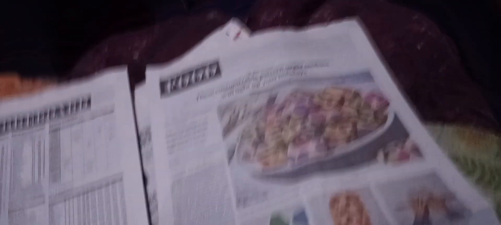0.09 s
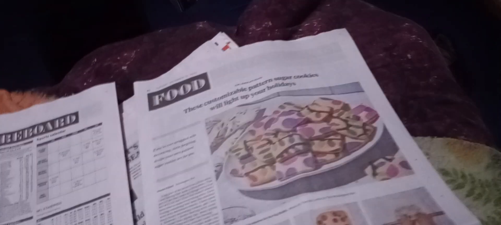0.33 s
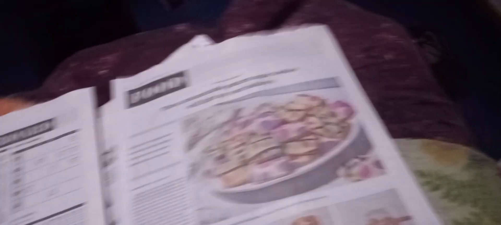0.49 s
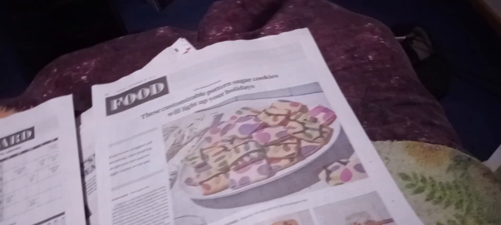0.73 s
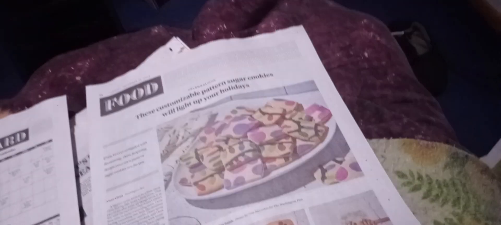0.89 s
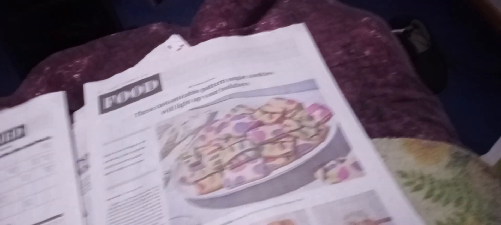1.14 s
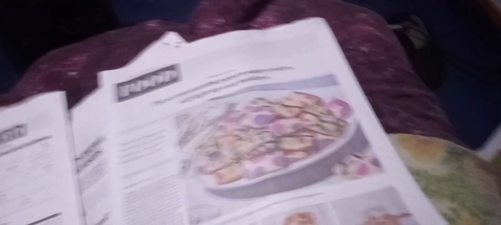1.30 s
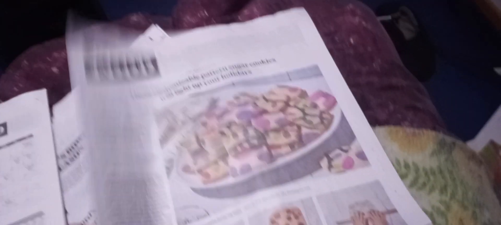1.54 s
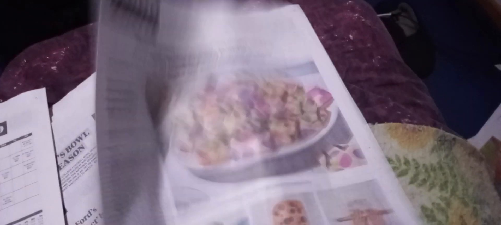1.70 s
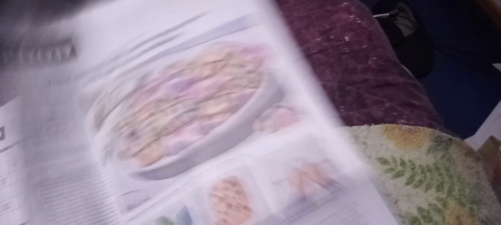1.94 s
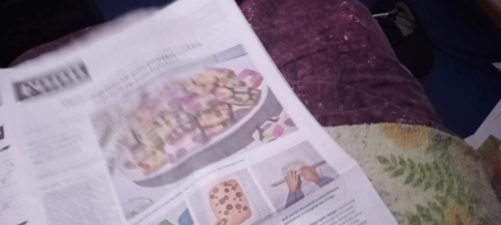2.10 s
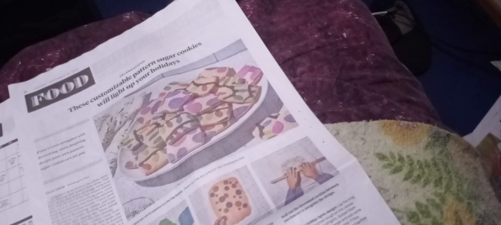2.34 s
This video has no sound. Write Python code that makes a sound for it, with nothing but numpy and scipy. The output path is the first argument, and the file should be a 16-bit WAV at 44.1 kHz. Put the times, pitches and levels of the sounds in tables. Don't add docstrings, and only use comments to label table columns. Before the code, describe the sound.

Crisp newspaper rustling in two busy bursts, with sharp fold snaps, fading to faint shuffles

```python
import sys
import numpy as np
from scipy import signal
from scipy.fft import rfft, irfft
from scipy.io import wavfile
from scipy.ndimage import uniform_filter1d

SR = 44100
rng = np.random.default_rng(int(sys.argv[2]) if len(sys.argv) > 2 else 0)


def master_out(mix):
    frames = np.transpose(np.atleast_2d(mix))
    ceiling = np.clip(frames, -1, 1)
    pcm = np.round(ceiling * 32767).astype(np.int16)
    wavfile.write(sys.argv[1], SR, pcm)


def decibels_to_gain(level_db):
    exponent = np.asarray(level_db, float) / 20
    return 10 ** exponent


N = 110250

# (start [s], hold [s], sliding [dB], crumpling [dB], hard bending [dB])
STROKES = [(.02, 0.21, -65.5, -67, -67.5), (.215, 0.03, -38.5, -32, -43),
           (0.249, 0.12, -47.5, -48.5, -58.5), (0.36, 0.057, -31, -33, -47), (0.422, 0.053, -41, -65, -56),
           (0.509, 0.032, -42.5, -36.5, -44.5), (0.553, 0.097, -37.5, -37.5, -61),
           (0.623, 0.057, -60, -36, -47), (0.709, 0.12, -31, -27.5, -43.5),
           (0.796, 0.17, -28.5, -32, -49.5), (0.932, 0.075, -32.5, -21.5, -29.5),
           (0.997, 0.17, -33, -34.5, -52.5), (1.14, 0.08, -55, -36, -82), (1.234, 0.24, -74, -51.5, -95),
           (1.42, 0.15, -55, -76, -95), (1.529, 0.35, -52, -43.5, -70), (1.636, 0.083, -35.5, -31.5, -56),
           (1.716, 0.021, -32, -32, -36.5), (1.748, 0.064, -32, -26.5, -34.5),
           (1.781, 0.14, -31.5, -27.5, -49), (1.921, 0.08, -43, -26, -44.5),
           (2.005, 0.085, -35.5, -29, -38), (2.095, 0.017, -61, -30, -55), (2.165, 0.06, -49, -42.5, -82),
           (2.244, 0.13, -42.5, -43.5, -72), (2.394, 0.079, -51, -49.5, -80), (2.456, 0.068, -41, -62, -65)]
# (start [s], hold [s], level [dB])
RUBS = [(.21, 0.069, -41.5), (.28, .08, -51), (.36, 0.063, -32.5), (.44, 0.21, -45), (.56, 0.067, -45),
        (.64, .1, -32.5), (.75, 0.076, -24.5), (.85, 0.06, -26.5), (.96, 0.084, -30), (1.04, 0.14, -35),
        (1.2, 0.72, -52), (1.64, 0.062, -43.5), (1.71, 0.042, -34), (1.77, 0.045, -25.5),
        (1.84, 0.066, -32.5), (1.93, .16, -41.5), (2.12, .15, -51), (2.28, 0.12, -44), (2.39, 0.054, -48),
        (2.455, 0.046, -42.5)]
# (time [s], peak [dB], body [dB], brightness [dB], length [ms])
SNAPS = [(0.216, -29.5, -20.5, -30, 0.97), (0.23, -20, -45, 7, 0.24),
         (0.372, -20.5, -25, -3, 1.6), (0.51, -17.5, -10.5, -3, 1.8),
         (0.5135, -15.5, -24, -16, 3), (0.5765, -21.5, -30, -13, 1.7),
         (0.637, -14.5, -20.5, -20, 0.87), (0.658, -16, -13.5, -12, 2.4),
         (0.678, -9, -29, -7.5, 1.69), (0.685, -24, -21, -35, 2.5), (0.72, -20, -12, -5.5, 1.6),
         (0.77, -20.5, -17.5, -10, 2.5), (0.832, -10, -40, -17, 0.57),
         (0.8625, -18, -33, -39, 1.8), (0.931, -13, -16, -10, 2.2), (0.94, -23, -9, -27, 1.2),
         (0.9515, -25, -40, -21, 1.5), (0.995, -17.5, -24, -7, 2.2),
         (1.086, -13.5, -9.5, -1.5, 1.7), (1.1455, -26.5, -25, -25, 2.4),
         (1.193, -27.5, -24.5, -30, 2.1), (1.197, -24, -18, -36, 1.3),
         (1.327, -34.5, -21, -40, 1.9),
         (1.387, -34.5, -19, -13, 7.1), (1.527, -35, -22, -22, 2.3), (1.54, -31, -30, -50, 1.8),
                     (1.64, -18.5, -6, -30, 1.9), (1.714, -21, -33, -11, 1.6),
                     (1.717, -12.5, -23, -5.5, 1.3), (1.7239, -12.5, -17, -10, 1.26),
                     (1.728, -16, -39, -15, 1.3), (1.777, -19, -27, -13, 4.7),
                     (1.815, -16.5, -16, -8, 2.24), (1.836, -13, -42, -25, 1.8),
                     (1.954, -22.5, -24, -25, 1.8), (1.96, -20, -21, -10, 1.1),
                     (1.968, -11.5, -24, 0.5, 1.23), (2.017, -14.5, -47, -11, 3), (2.032, -28, -6, -6, 2.9),
                     (2.037, -12, -42, -15.5, 0.51), (2.057, -17, -35, 1, 0.52),
                     (2.085, -16.5, -55, -16, 3.9), (2.2012, -21.5, -47, -25, 0.52),
                     (2.209, -38, -9.5, -35, 4.2), (2.43, -29.5, -32, -35, 1.9)]
# (time [s], peak [dB], pitch [Hz], length [ms])
TICKS = [(0.375, -26, 2720, 0.88), (.814, -19.5, 1760, 2.1), (0.945, -14, 2180, 1.2),
         (.973, -19, 2100, 2.4), (0.986, -28, 1930, 1.5), (1.005, -39, 2000, 1.4), (1.087, -18, 3150, 2.2),
         (.219, -27.5, 2050, 1.3), (1.214, -35, 2250, 2.1), (1.554, -32.5, 2000, 2.8),
         (1.619, -36, 2270, 2.3), (1.65, -35, 1820, 1.2), (1.66, -32, 2000, 1.8), (1.7268, -13.5, 2000, .6),
         (1.765, -21.5, 2000, 1.5), (1.847, -28, 2200, 1.2), (2.1, -32, 1900, 1.8), (2.112, -30, 1580, 2),
         (2.202, -25, 1780, 3.5), (2.285, -40, 1920, 1.3)]
# (time [s], level [dB], pitch [Hz], length [s])
FLAPS = [(0.11, -70, 387, 0.017), (.655, -61.5, 244, 0.0085), (0.884, -58.5, 268, 0.018),
         (0.955, -61, 294, 0.011), (.985, -53, 272, 0.023), (1.678, -64.5, 217, 0.047),
         (1.722, -46.5, 290, 0.0088), (1.76, -60.5, 190, .015), (1.785, -52, 313, 0.023),
         (1.836, -54, 285, 0.0084), (2.04, -69, 323, 0.027)]
# (time [s], level [dB], pitch [Hz], length [s])
BUMPS = [
    (0.152, -63, 78, 0.064),
    (0.454, -63, 84, 0.045),
    (0.798, -61, 78, 0.028),
    (1.375, -60, 71, 0.13),
    (2.37, -68.5, 70, 0.12),
]
# (time [s], left over right [dB])
PLACE = [(0, 17), (.26, 16), (.31, 32), (.76, 27.5), (.88, 17), (1.6, 23.5), (1.8, 18.5), (2.5, 20.5)]
# (frequency [Hz], level per Hz [dB])
HISS_TONE = [(100, -51), (500, -25), (1500, -8), (4000, 1), (8000, 0), (16000, 3.5)]
CREASE_TONE = [(100, -46), (500, -11.5), (1200, -0.5), (2500, 1.5), (5000, -6.5), (16000, -13.5)]
DULL_TONE = [(100, -19.5), (260, 0.5), (420, 0.5), (800, 9), (1500, -9.5), (4000, -14.5)]
AIR_TONE = [(25, -17), (60, 2), (90, 1), (300, -10.5), (1000, -26), (4000, -25), (9000, -38), (16000, -32)]
# (frequency [Hz], level [dB])
LEFT_MIC = [(60, -20), (900, -8), (2000, -3), (4100, -6.5), (7300, -9), (9000, -38), (12500, -58),
            (15600, -33)]
RIGHT_MIC = [(60, -24), (900, -16.5), (4500, -27), (6500, -23.5), (8600, -33), (10800, -20.5), (13000, -33),
             (15600, -24.5)]
# (frequency [Hz], width [octaves], level [dB])
LEFT_PORT = [
    (2000, 0.36, 3.5),
    (3857, 0.048, 1.5),
    (4970, 0.14, -8),
    (6110, 0.11, 4),
]

SNAP_DB = 4.5


def unit(x):
    return x / np.sqrt(np.mean(x ** 2))


def colour(x, points, port=()):
    p = np.array(points, float)
    hz = np.maximum(np.fft.rfftfreq(4096, 1 / SR), 10)
    db = np.interp(np.log(hz), np.log(p[:, 0]), p[:, 1])
    for centre_hz, octaves, gain_db in port:
        db = db + gain_db * np.exp(-.5 * (np.log2(hz / centre_hz) / octaves) ** 2)
    cepstrum = irfft(np.log(decibels_to_gain(db)))
    cepstrum[1:2048] *= 2
    cepstrum[2049:] = 0
    response = irfft(np.exp(rfft(cepstrum)))
    return signal.fftconvolve(x, response)[:N]


def at_left_mic(x):
    return colour(x, LEFT_MIC, LEFT_PORT)


def heard(x):
    return x / np.sqrt(np.mean(at_left_mic(x) ** 2))


def walk(rate_hz):
    hold = int(SR / rate_hz)
    steps = np.repeat(rng.standard_normal(N)[:N // hold + 1], hold)
    smooth = uniform_filter1d(uniform_filter1d(steps, hold), hold)
    return unit(smooth[:N])


def grains(rate_hz, scatter_db):
    chance, sign, size = rng.random((3, N))
    clicks = (chance < rate_hz / SR) * np.sign(sign - .5)
    return clicks * decibels_to_gain(scatter_db * np.minimum(-np.log(1 - size), 3.2))


def spread(make, apart):
    shared = make()
    own = np.array([make(), make()])
    return np.sqrt(1 - apart) * shared + np.sqrt(apart) * own


def effort(table, column):
    attack_db_s, release_db_s, arch_db = 880, 456, 2.5
    t, power = np.arange(N) / SR, 0
    for row in table:
        start, hold = row[0], row[1]
        rise = attack_db_s * np.maximum(start - t, 0)
        fall = release_db_s * np.maximum(t - start - hold, 0)
        arch = arch_db * np.clip((2 * (t - start) / hold - 1) ** 2, 0, 1)
        power = power + decibels_to_gain(row[column] - rise - fall - arch) ** 2
    return np.sqrt(power)


def slide():
    hiss = spread(lambda: heard(colour(grains(8810, 1), HISS_TONE)), apart=1)
    low = signal.sosfilt(signal.butter(4, 8500, fs=SR, output="sos"), hiss)
    high = signal.sosfilt(signal.butter(4, 8300, "high", fs=SR, output="sos"), hiss)
    rubbing = effort(RUBS, column=2) * decibels_to_gain(0.84 * walk(12.3))
    dragging = effort(STROKES, column=2) * decibels_to_gain(3 * walk(30.67))
    return (low * dragging + high * rubbing) * decibels_to_gain(-2.5)


def patches(count):
    low_hz, high_hz, ring_cycles = 558, 6600, 1.7
    out = 0
    for k, u in enumerate(rng.random(count)):
        hz = low_hz * (high_hz / low_hz) ** ((k + u) / count)
        r = np.exp(-hz / SR / ring_cycles)
        creases = grains(446.4, 3.0)
        ring = signal.lfilter([1, 0, -1], [1, -2 * r * np.cos(2 * np.pi * hz / SR), r * r], creases)
        out = out + unit(ring) * np.sqrt(hz) * decibels_to_gain(1.4 * walk(21.66))
    return out


def crumple():
    large = heard(colour(grains(500, 1.7), DULL_TONE)) * decibels_to_gain(2.7 * walk(40.3))
    tremble = decibels_to_gain(-3.5 + 1.8 * walk(90))
    small = spread(lambda: heard(colour(patches(count=10), CREASE_TONE)), apart=0.97)
    return tremble * (effort(STROKES, column=3) * small + effort(STROKES, column=4) * large)


def snaps():
    out, n, early = np.zeros(N + 2048), 1024, 64
    t_ms, hz = np.arange(n) / SR * 1000, np.fft.rfftfreq(n, 1 / SR) + 1
    main = np.exp(-.5 * (np.log2(hz / 1868) / .62) ** 2) / (1 + (1250 / hz) ** 4)
    body = decibels_to_gain(18) * np.exp(-.5 * (np.log2(hz / 760) / 0.41) ** 2)
    bright = decibels_to_gain(3) / (1 + (3300 / hz) ** 4 + (hz / 8500) ** 4)
    for s, db, body_db, bright_db, ms in SNAPS:
        envelope = (1 - np.exp(-t_ms / (0.061 * ms))) * np.exp(-t_ms / ms)
        burst = rng.standard_normal(n) * envelope
        shape = main + decibels_to_gain(body_db) * body + decibels_to_gain(bright_db) * bright
        burst = irfft(rfft(np.roll(burst, early)) * shape)
        i = int(s * SR) - early
        out[i:i + n] += burst * decibels_to_gain(db + SNAP_DB) / np.abs(at_left_mic(burst)).max()
    return out[:N]


def ticks():
    out, n = np.zeros(N + 2048), 1024
    t = np.arange(n) / SR
    for s, db, hz, ms in TICKS:
        ring = 0
        for k, v in zip((0, -1, 2), rng.standard_normal(3)):
            tone_hz = hz * 2 ** (0.334 * k * abs(v))
            ring = ring + np.sin(2 * np.pi * tone_hz * t) / (1 + 2 * abs(k))
        ring = ring * (1 - np.exp(-t * 4000)) * np.exp(-t * 1000 / ms)
        i = int(s * SR)
        out[i:i + n] += ring * decibels_to_gain(db + SNAP_DB) / np.abs(at_left_mic(ring)).max()
    return out[:N]


def mirror(x):
    gap_ms = .55 * decibels_to_gain(1.34 * walk(4.05))
    at = np.arange(N) - gap_ms * SR / 1000
    return x + decibels_to_gain(-11) * np.array([np.interp(at, np.arange(N), c) for c in x])


def bumps_and_flaps():
    t, low = np.arange(N) / SR, 0
    for s, db, hz, length in [*BUMPS, *FLAPS]:
        swell = np.exp(-.5 * ((t - s) / (0.32 * length)) ** 2)
        low = low + decibels_to_gain(db + 24.5) * np.sin(2 * np.pi * hz * (t - s)) * swell
    return np.array([low, decibels_to_gain(-8.5) * low])


def room(x):
    level_db, t60_s, top_hz = -15, 0.15, 5200
    t = np.arange(int(.3 * SR)) / SR
    tail = rng.standard_normal((2, len(t))) * decibels_to_gain(-60 * t / t60_s) * (t > .004)
    tail = signal.sosfilt(signal.butter(1, top_hz, fs=SR, output="sos"), tail)
    tail = tail / np.sqrt((tail ** 2).sum(axis=1, keepdims=True))
    return decibels_to_gain(level_db) * signal.fftconvolve(x, tail, axes=1)[:, :N]


def air():
    noise = spread(lambda: heard(colour(rng.standard_normal(N), AIR_TONE)), apart=1 - 0.78)
    return noise * decibels_to_gain(-63.5 + 1.6 * walk(5))


def scene():
    paper = mirror(slide() + crumple()) + snaps() + ticks()
    place = np.array(PLACE)
    left_over_right_db = np.interp(np.arange(N) / SR, place[:, 0], place[:, 1])
    turn_db = 0.61 * (21 - left_over_right_db)
    paper = paper * decibels_to_gain(np.array([0 * turn_db, turn_db]))
    left, right = paper + room(paper) + air() + bumps_and_flaps()
    lead_s = 0.001065
    lead = int(lead_s * SR)
    return np.array([left, np.r_[right[lead:], right[-lead:]]])


def band_limit(x):
    return signal.sosfilt(signal.butter(12, 16790, fs=SR, output="sos"), x)


def record(dry):
    x = np.array([at_left_mic(dry[0]), colour(dry[1], RIGHT_MIC)])
    top_cut = signal.ellip(10, .2, 80, 15950, fs=SR, output="sos")
    mix = signal.sosfilt(top_cut, np.tanh(x))
    return band_limit(mix)


dry = scene()
out = record(dry)
master_out(out)
```